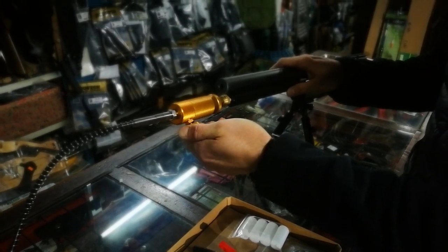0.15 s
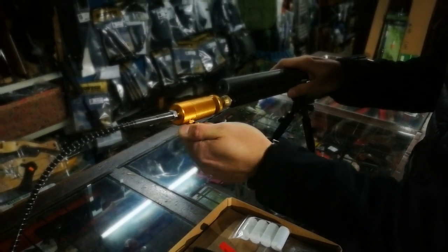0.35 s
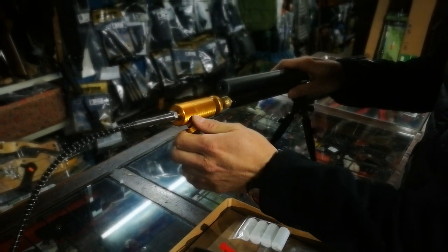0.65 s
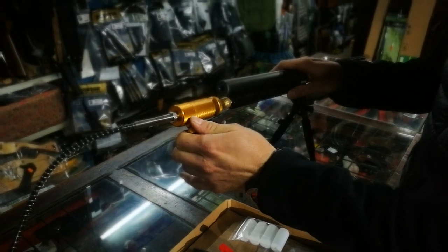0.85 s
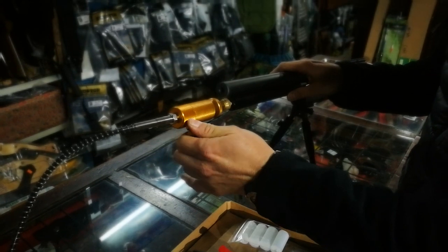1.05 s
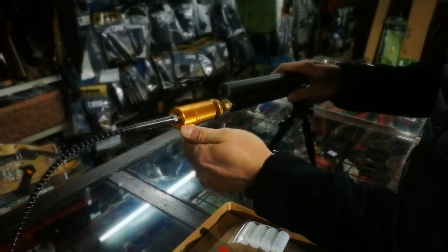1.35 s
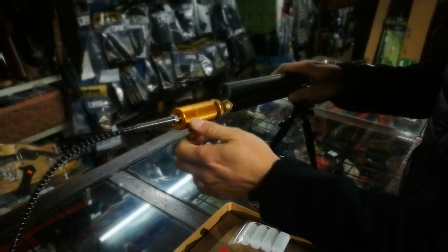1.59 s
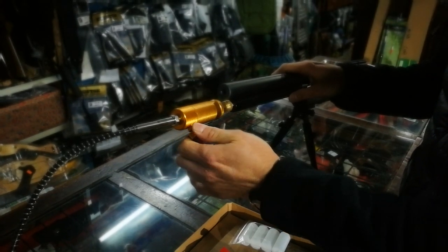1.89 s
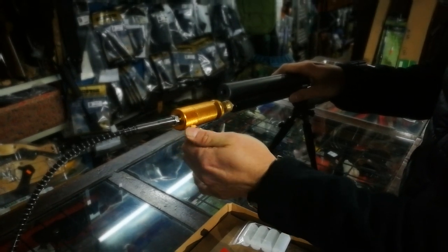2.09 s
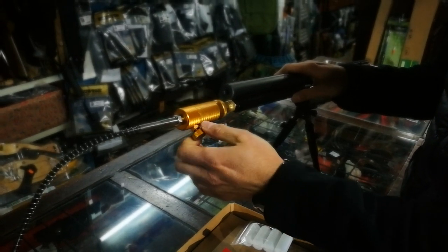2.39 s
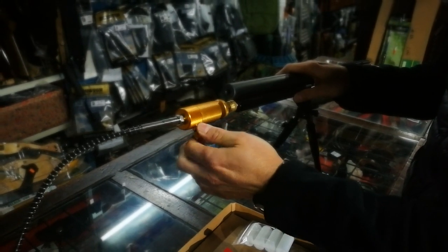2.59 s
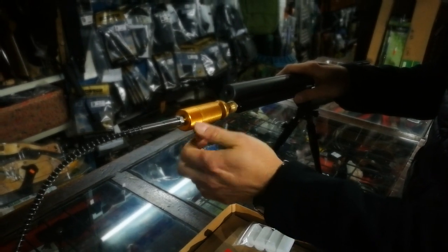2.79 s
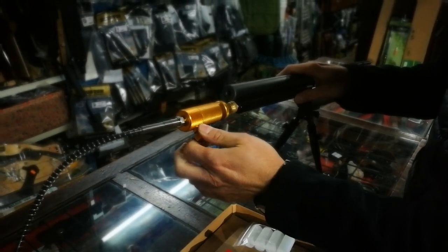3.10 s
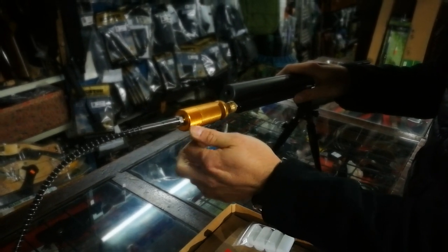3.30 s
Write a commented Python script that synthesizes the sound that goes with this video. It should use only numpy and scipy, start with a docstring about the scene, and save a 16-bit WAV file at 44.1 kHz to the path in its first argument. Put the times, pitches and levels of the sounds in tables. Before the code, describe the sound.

Compressed air hisses hard from a hose coupling with sharp spitting pops, then fades in steps.

```python
"""Compressed air escapes from a hose coupling as a hand opens the bleed screw in small turns, indoors.
First the jet (noise shaped in bands) hisses hard and spits sharp pops (short spikes), stronger on the right.
Then the hiss sinks in steps, with brief rises; its lower bands drop away faster than the treble.
A faint patchy room rumble (noise) lies under it all, swelling once; near the end a faint short tone sounds."""
import sys
import numpy as np
from scipy import signal
from scipy.io import wavfile
from scipy.ndimage import uniform_filter1d

SR = 44100
rng = np.random.default_rng(int(sys.argv[2]) if len(sys.argv) > 2 else 0)


def gain_from_db(level_db):
    """Convert decibel levels to linear amplitude factors (20 dB per decade)."""
    decades = np.asarray(level_db, float) / 20
    return 10 ** decades


def transcribe(u):
    """Save the signal u as a 16-bit wav file named by the first command-line argument.

    u: samples, shape (n,) or (channels, n), limited to [-1, 1]; the rate is SR.
    q: integer samples, one column per channel.
    """
    v = np.clip(np.atleast_2d(u).T, -1, 1)
    q = np.round(v * 32767).astype(np.int16)
    wavfile.write(sys.argv[1], SR, q)


N = 152145  # length of the sound in samples


def evened(x):
    """Scales so that the mean of both channels has rms 1."""
    return x / np.sqrt(np.mean(x.mean(0) ** 2) + 1e-20)


def read_spectrum(points, hz, column=1):
    """Reads a spectrum table on a log-frequency axis."""
    p = np.array(points)
    return np.interp(np.log(hz + 1), np.log(p[:, 0] + 1), p[:, column])


def gain_curve(points, column):
    """Turns a table of levels over time into a gain for each sample."""
    p = np.array(points)
    return gain_from_db(np.interp(np.arange(N) / SR, p[:, 0], p[:, column]))


def microphone_pair(size, same, lead=0):
    """Random short-time spectra for two microphones: the right one shares part of the left one's noise."""
    a, b, c, d = rng.standard_normal((4 * N // size + 6, size // 2 + 1, 4)).T
    same = np.clip(same, -1, 1)[:, None]
    left = a + 1j * b
    own = c + 1j * d
    right = np.exp(1j * lead) * (same * left + np.sqrt(1 - same ** 2) * own)
    return np.array([left, right])


def to_sound(spectra):
    """Turns short-time spectra back into samples at rms 1."""
    size = 2 * (spectra.shape[1] - 1)
    return evened(signal.istft(spectra, nperseg=size, noverlap=3 * size // 4)[1][:, :N])


def room_rumble():
    """Faint low noise of the room that comes and goes in patches and swells briefly once."""
    # shape of the rumble, before its overall level: (frequency [Hz], density [dB per Hz])
    room_shape = [(20, -10), (76, -4), (110, -9), (200, -11.5), (300, -9), (500, -19), (800, -27)]
    # how alike the two microphones are: (frequency [Hz], likeness [0-1])
    room_same = [(130, 1), (600, 0.064)]
    rumble_db, patch_db = -85, 2.5
    swell_at_s, swell_width_s, swell_db = 1.425, .025, 9
    hz = np.fft.rfftfreq(2048, 1 / SR)
    spectra = microphone_pair(size=2048, same=read_spectrum(room_same, hz))
    spectra = spectra * gain_from_db(read_spectrum(room_shape, hz))[:, None]
    field = rng.standard_normal(spectra.shape[:0:-1]).T
    patches = uniform_filter1d(uniform_filter1d(field, size=3, axis=0), size=8, axis=1)
    rumble = to_sound(spectra * gain_from_db(patch_db * patches / patches.std()))
    t = np.arange(N) / SR
    swell = swell_db * np.exp(-.5 * ((t - swell_at_s) / swell_width_s) ** 2)
    return gain_from_db(rumble_db + swell) * rumble


def short_tone():
    """A faint short sine tone that rises and falls under a rounded arch, the same on both sides."""
    start_s, length_s, tone_hz, peak_db = 3.14, .09, 464, -84
    t = np.arange(N) / SR
    arch = abs(np.sin(np.pi * np.clip((t - start_s) / length_s, 0, 1))) ** .5
    return gain_from_db(peak_db) * arch * np.sin(2 * np.pi * tone_hz * t)


def pop_train():
    """Single-sample clicks that set when each pop starts and how strong it is."""
    # the loudest pops, levels before the pop shape is applied: (time [s], level [dB])
    loud_pops = [(0.0402, -10.3), (0.0411, -9.3), (0.045, -11.1), (0.0863, -11.2), (0.0889, -10.5),
                 (0.1034, -12.0), (0.1223, -9.9), (0.1255, -11.8), (0.1328, -9.7), (0.1366, -12.4),
                 (0.1401, -15.1), (0.1447, -8.9), (0.1514, -11.7), (0.1571, -14.1), (0.1761, -11.0),
                 (0.2072, -10.3), (0.2142, -12.0), (0.2156, -13.2), (0.2247, -9.7), (0.2296, -9.5),
                 (0.2388, -10.6), (0.2588, -8.7), (0.2601, -9.2)]
    # small pops come at random: full strength between start and fade, then dying away
    small_start_s, small_fade_s, fade_db_per_s = .012, .262, -210
    small_per_s, small_db, spread_db = 350, -25, 0.5  # the spread only adds to the level
    t = np.arange(N) / SR
    chance, size = rng.random(N), rng.exponential(1, N)
    happens = (chance < small_per_s / SR) * (t > small_start_s)
    fade = fade_db_per_s * np.maximum(t - small_fade_s, 0)
    train = happens * gain_from_db(small_db + fade + spread_db * np.minimum(size, 3))
    for s, db in loud_pops:
        train[round(s * SR)] += gain_from_db(db)
    return train


def sag(x, hz):
    """A gentle low cut: it makes a one-sided spike sag back below zero."""
    return signal.lfilter([1, -1], [1, -np.exp(-2 * np.pi * hz / SR)], x)


def pops():
    """One-sided pressure spikes, later and duller on the left; suction after each pulls a low thump."""
    # columns below: left (far) microphone, then right (near) one
    delay_s = np.array([[0.000697], [0]])
    spike_db = np.array([[-13.5], [0]])  # before the sag
    spike_width_s = np.array([[6e-5], [3.4e-5]])
    thump_db = np.array([[-31], [-30]])  # before the bass cut
    thump_lag_s = np.array([[4e-4], [0]])
    thump_hz, sag_hz, bass_cut_hz = 255, 540, 7
    before = 16  # samples of room ahead of the spike's peak
    t = np.arange(-before, 8000) / SR - delay_s
    spike = sag(gain_from_db(spike_db) * np.exp(-.5 * (t / spike_width_s) ** 2), sag_hz)
    late = np.maximum(t - thump_lag_s, 0) * 2 * np.pi * thump_hz
    thump = sag(gain_from_db(thump_db) * late * np.exp(1 - late), bass_cut_hz)
    shape = spike / spike.max() - thump
    return signal.oaconvolve(pop_train()[None], shape, axes=1)[:, before:N + before]


def near_surface(hz):
    """A near surface reflects the jet into the left microphone, which ripples its spectrum."""
    delay_s, share, top_hz = 1.25e-3, .35, 6500
    echo = 1 + share / (1 + (hz / top_hz) ** 4) * np.exp(-2j * np.pi * hz * delay_s)
    return np.array([abs(echo), 1 + 0 * hz])[:, :, None]


def jet_spectra(hz):
    """Turbulent noise of the jet: coloured at each microphone, with drifting patches and level flutter."""
    # colour of the jet at each microphone: (frequency [Hz], left level [dB], right level [dB])
    colour = [(246, -8, -8.5), (505, 0.5, -1), (684, -14.5, -4.5), (1140, -1.5, 1), (1268, -7.5, -4),
              (1670, -12, 1.5), (2020, -14.5, 2), (2280, -8, -4), (2500, -9, -0.5), (2700, -7.5, 3),
              (2940, -6.5, -0.5), (3190, -3, 3), (3900, -6.5, 6), (4860, 0.5, 4), (5600, -2.5, -0.5),
              (6800, -1, -2.5), (7980, -1.6, 1.5), (9550, -2.2, -6.5), (11600, -5.5, -1.5),
              (13800, -5.5, 2), (15700, -0.5, 5)]
    # how the two microphones relate: (frequency [Hz], likeness [0-1], lead of the right one [radians])
    relation = [(0, 0.94, -0.6), (530, 0.86, 3), (800, 1, 1), (1340, 0.95, 0.57), (1980, 0.42, -0.5),
                (2390, 0.97, -1.5), (3180, 0.32, -2), (4310, 0.79, -3), (4600, 0.29, -3.5),
                (6100, 0.4, -5.5), (7190, 0.34, -3.5), (8650, 0.84, -5.5), (10600, 0.75, -5),
                (12460, 0.5, -8), (13530, 0.8, -12), (15100, 0.6, -8)]
    patch_db, flutter_db = 1.5, 0.38
    p = np.array(relation)
    same = np.interp(hz, p[:, 0], p[:, 1])
    lead = np.interp(hz, p[:, 0], p[:, 2])[:, None]
    spectra = microphone_pair(size=512, same=same, lead=lead)
    field = rng.standard_normal((spectra.shape[2], spectra.shape[1] + 1)).T
    patches = uniform_filter1d(uniform_filter1d(field[1:], 4, 0), 70, 1)
    flutter = uniform_filter1d(field[0], 8)  # moves all frequencies together
    tint = np.array([read_spectrum(colour, hz, column=1), read_spectrum(colour, hz, column=2)])[:, :, None]
    drift = patch_db * patches / patches.std() + flutter_db * flutter / flutter.std()
    spectra = spectra * gain_from_db(tint + drift) * near_surface(hz)
    # the first blast is duller at the very top
    dull_above_hz, dull_db, dull_until_s = 13200, -4, .34
    in_blast = np.linspace(0, N / SR, spectra.shape[2]) < dull_until_s
    return spectra * gain_from_db(dull_db * np.outer(hz > dull_above_hz, in_blast))


def jet():
    """Escaping air hisses: the jet's noise is split into bands, and each follows its own level over time."""
    # lower edges of the hiss bands: [Hz]
    edges_hz = [120, 620, 1230, 2400, 5500, 10500]
    # how softly each edge sets in: [octaves]
    edge_width = [.1, .025, .025, .025, .25, .25]
    # level of the hiss in each band: (time [s], 0.6-1.2 kHz level [dB], 1.2-2.4 kHz level [dB],
    # 2.4-5.5 kHz level [dB], 5.5-10.5 kHz level [dB], top level [dB])
    hiss = [(0, -66, -48, -44, -40.5, -28.5), (0.05, -63.5, -49, -45.5, -40, -29),
            (0.13, -47.5, -41.5, -40, -39.5, -25), (0.17, -50, -45.5, -38.5, -38, -27.5),
            (0.25, -52.5, -42, -37, -35, -20.5), (0.29, -56.5, -48, -41.5, -35.5, -21.5),
            (0.33, -64.5, -47.5, -45.5, -36.5, -25.5), (0.39, -64.5, -50.5, -45, -42, -33),
            (0.62, -63, -49, -44.5, -43, -36), (0.72, -66, -50, -44, -39.5, -33.5),
            (0.755, -61, -48.5, -46.5, -46, -38.5), (0.8, -75.5, -58.5, -51.5, -49, -39.5),
            (1.25, -83.5, -63.5, -54, -50.5, -42), (1.31, -74, -56.5, -48, -48, -41.5),
            (1.36, -76, -62, -51, -49.5, -41), (1.43, -70.5, -58.5, -50.5, -48, -39.5),
            (1.5, -80.5, -65, -55.5, -51, -41), (1.66, -78, -61, -51.5, -51, -45.5),
            (1.71, -69, -53, -49, -50.5, -43), (1.77, -74, -57.5, -52, -53, -47),
            (1.81, -85, -65, -56, -54, -46), (2.2, -80.5, -67, -55.3, -55, -45.5),
            (2.25, -69.5, -56, -49, -54, -45.5), (2.38, -75, -56.5, -53, -52, -44.5),
            (2.43, -89, -57.5, -54, -57.5, -48.5), (2.535, -77.5, -61.5, -57, -58.5, -49),
            (2.56, -89, -78, -61, -60.5, -51), (2.855, -89, -79.5, -62.5, -60.5, -51.5),
            (2.885, -82, -70.5, -55.5, -61, -51), (2.98, -75.5, -63.5, -57, -58.5, -53.5),
            (3.04, -83, -68, -55, -56.5, -48), (3.085, -77, -64.5, -59, -61, -51),
            (3.11, -95, -77, -66, -62, -54), (3.14, -82, -78, -62.5, -64, -53),
            (3.17, -88.4, -81, -61.5, -57, -48), (3.2, -88, -78, -61.5, -61, -53),
            (3.3, -94, -80, -62, -61, -58), (3.45, -90, -79.5, -63, -61.5, -58)]
    hz = np.fft.rfftfreq(512, 1 / SR)
    spectra = jet_spectra(hz)
    above = [.5 + .5 * np.tanh(np.log2((hz + 1) / edge) / width) for edge, width in zip(edges_hz, edge_width)]
    above.append(0 * hz)  # the top band has no upper edge
    levels = [gain_curve(hiss, column=k) for k in range(1, len(edges_hz))]
    # the lowest band follows the one above it, 14.5 dB weaker
    levels = [gain_from_db(-14.5) * levels[0]] + levels
    total = 0
    for k, level in enumerate(levels):
        band = (above[k] - above[k + 1])[:, None]
        total = total + level * to_sound(spectra * band)
    return total


def scene():
    """Jet, pops, room rumble and short tone together."""
    return jet() + pops() + room_rumble() + short_tone()


def top_cut(x):
    """Nothing passes above the cut-off."""
    return signal.sosfilt(signal.butter(12, 17080, fs=SR, output="sos"), x)


def record(dry):
    """Limits the treble at 15750 Hz and adds the steady offset of the converter."""
    low_pass = signal.firwin(1023, 15750, window=("kaiser", 9), fs=SR)
    limited = signal.oaconvolve(dry, low_pass[None], "same")
    offset_db = -84  # its sign is negative
    return top_cut(limited - gain_from_db(offset_db))


dry = scene()
out = record(dry)
transcribe(out)
```